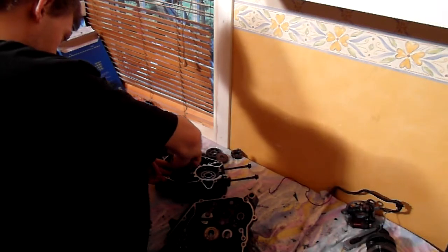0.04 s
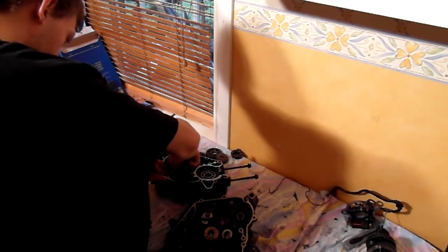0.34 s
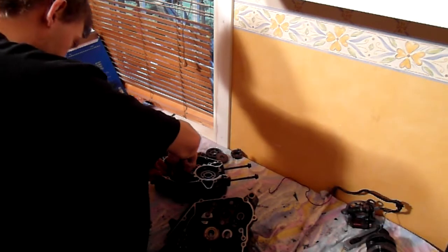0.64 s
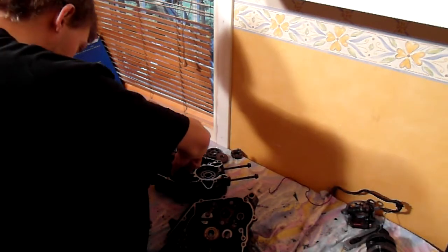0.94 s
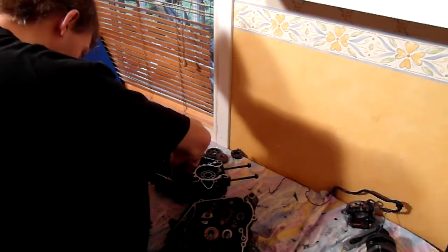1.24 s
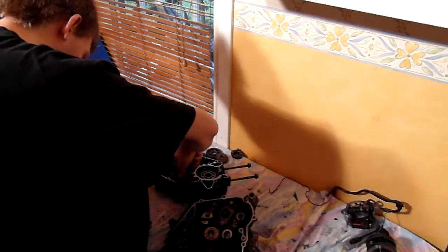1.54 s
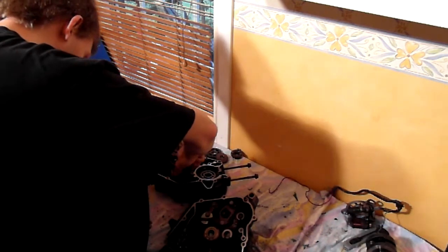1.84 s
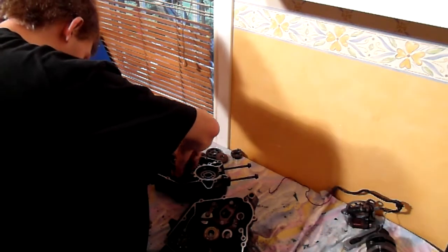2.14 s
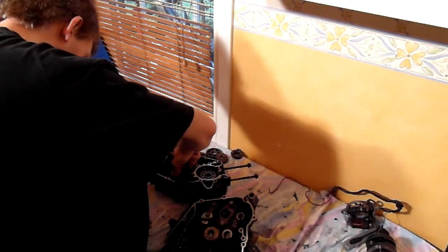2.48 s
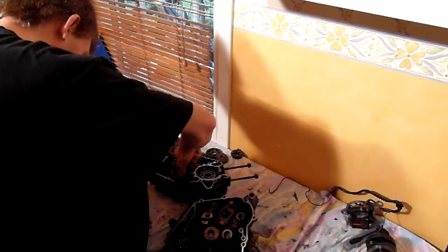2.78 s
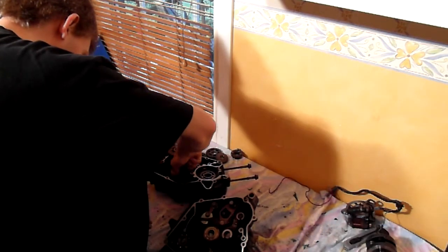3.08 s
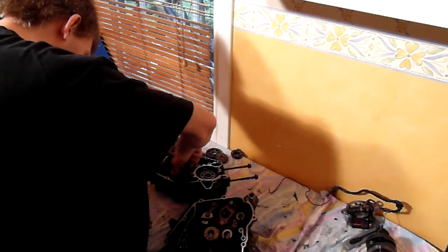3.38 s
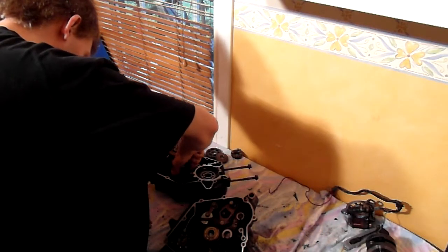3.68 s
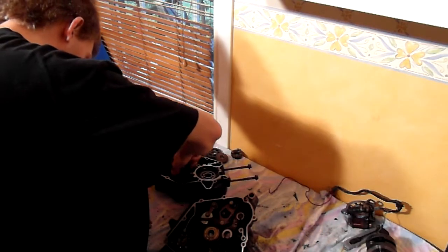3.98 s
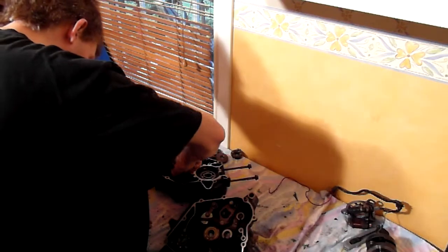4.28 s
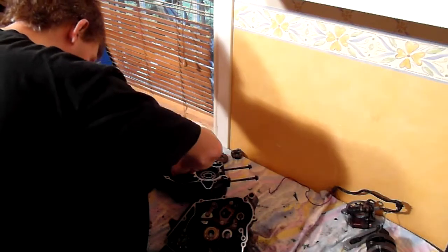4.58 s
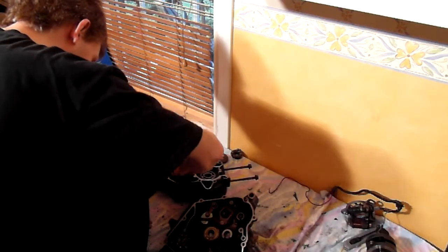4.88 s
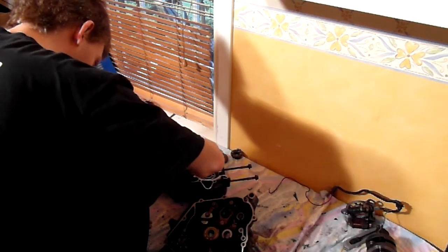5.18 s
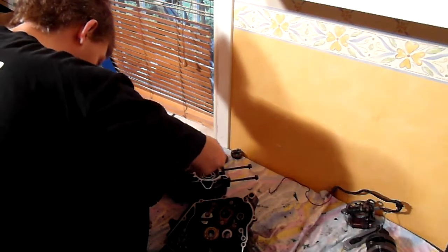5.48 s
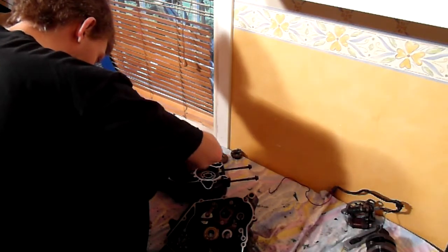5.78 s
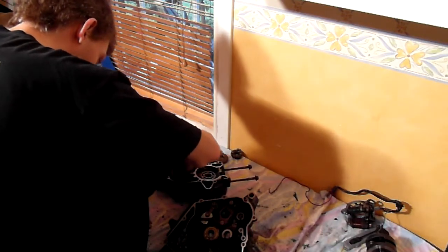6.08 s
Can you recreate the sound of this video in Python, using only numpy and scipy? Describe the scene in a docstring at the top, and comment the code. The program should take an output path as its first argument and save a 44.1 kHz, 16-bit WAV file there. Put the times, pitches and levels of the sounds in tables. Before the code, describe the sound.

A small gearbox being shifted by hand on a workshop table, ticking faintly at first, then snapping and clunking into gear.

```python
"""Light clicks and soft bumps, then louder clunks: a small gearbox in an open engine case is shifted
by hand on a table in a workshop corner. The shift pawl clicks and the detent snaps home. In each shift
the gear dogs butt, slide on and drop into their slots; in between, the shafts bump in their play.
Each impact excites the resonances of the steel parts or of the case, and the parts rebound.
Near walls reflect every blow at once; a faint hiss and hum lie underneath."""
import sys
import numpy as np
from scipy import signal
from scipy.fft import rfft, irfft
from scipy.io import wavfile

SR = 44100
rng = np.random.default_rng(int(sys.argv[2]) if len(sys.argv) > 2 else 0)


def dump(signal):
    """Clip the signal to [-1, 1] and save it as 16-bit WAV at the path in sys.argv[1]."""
    limited = np.clip(np.atleast_2d(signal).T, -1, 1)
    pcm = np.round(limited * 32767).astype(np.int16)
    wavfile.write(sys.argv[1], SR, pcm)


N = 270308
RING = np.arange(16384) / SR  # time axis of one blow, in seconds

# Normal modes of the case on its table. Each row: frequency in Hz, level in dB, 60 dB decay in seconds.
CASE_MODES = [(127.5, -22, 0.53), (160.7, -5.5, 0.2), (195, 2, 0.15), (258.2, -4, 0.21),
              (286.3, -10.5, 0.24), (339.2, 0.5, 0.15), (411.2, -13.5, 0.4), (455.1, -9, 0.24),
              (574, -14, 0.31), (552, -1, 0.051), (675, -33.5, 0.57), (719, -11.5, 0.24), (802, -2, 0.2),
              (919, -16, 0.079)]
# Spectra of overlapping modes in the case and in the gears, and a flat spectrum.
# Each row: frequency in Hz, relative spectral density in dB.
CASE_DENSE_MODES = [(30, -22), (62, -27), (110, 10.5), (170, -1), (280, 2.5), (420, 3.5), (640, -2.5),
                    (850, -0.5), (1000, -14.5), (1200, -24), (3000, -37.5)]
GEAR_DENSE_MODES = [(300, -3), (900, 6.5), (1250, -1.5), (1700, 4.5), (3900, 2.5), (6000, 0.5),
                    (9000, -3.5), (11500, -7)]
WHITE = [(20, 0), (20000, 0)]


def from_db(db):
    """Amplitude ratio of a level in decibels."""
    return 10 ** (np.asarray(db) / 20)


def at_hz(points, hz):
    """Interpolation of a table on a logarithmic frequency axis."""
    known_hz, values = np.transpose(points)
    return np.interp(np.log(hz + 1), np.log(known_hz), values)


def butter(x, hz, kind, order=2):
    """Causal low- or high-pass with a maximally flat passband."""
    return signal.sosfilt(signal.butter(order, np.clip(hz, 15, .45 * SR), kind, fs=SR, output="sos"), x)


def unit_attack(x):
    """Normalisation of a blow to rms 1 over its first 20 ms."""
    return x / np.sqrt(np.mean(x[..., :SR // 50] ** 2) + 1e-20)


def decay(t60):
    """Exponential damping: the envelope falls 60 dB in t60 seconds."""
    return np.exp(-np.log(1000) * RING / max(t60, 1e-3))


def resonate(x, hz, width_hz):
    """Two-pole resonance with unit gain at its peak."""
    r = np.exp(-np.pi * width_hz / SR)
    feedback = [1, -2 * r * np.cos(2 * np.pi * hz / SR), r * r]
    return signal.lfilter(np.array([1, 0, -1]) * (1 - r * r) / 2, feedback, x)


def through_peaks(x, peaks):
    """Forced vibration of a steel part: parallel resonances of alternating sign."""
    return unit_attack(sum((-1) ** k * from_db(db) * resonate(x, hz, width_hz)
                           for k, (hz, width_hz, db) in enumerate(peaks)))


def struck(modes, spread_db):
    """Free vibration: a sum of damped modes, each with a random sign and strength."""
    ring = 0
    for hz, db, t60 in modes:
        amplitude = rng.choice([-1, 1]) * from_db(db + spread_db * rng.standard_normal())
        ring += amplitude * np.sin(2 * np.pi * hz * RING) * decay(t60)
    return unit_attack(ring)


def diffuse_noise(spectrum, correlation, size):
    """Diffuse field: noise from all sides is partly correlated at two close microphones; rms 1."""
    hz = np.fft.rfftfreq(size, 1 / SR)
    mid, side = rfft(rng.standard_normal((2, size)))
    alike = np.clip(at_hz(correlation, hz), -.99, .995)
    pair = np.sqrt(1 + alike) * mid + np.sqrt(1 - alike) * side * [[1], [-1]]
    noise = irfft(pair * from_db(at_hz(spectrum, hz)), size)
    return noise / noise.std()


def still_room(hiss_db=-64, hum_db=-79, hum_hz=99):
    """Noise floor: stationary hiss with a trace of mains hum."""
    # The hiss. Each row: frequency in Hz, relative spectral density in dB.
    spectrum = [(15, -64), (25, -13), (70, -16), (90, -6.5), (126, -9), (184, -8.5), (204, -4.5), (257, -6),
                (398, -2.5), (476, -7.5), (514, -4), (615, -7), (815, -8.5), (1200, -11.5), (11400, -18.5),
                (14800, -111), (22000, -120)]
    # Its likeness at the microphones. Each row: frequency in Hz, correlation coefficient.
    correlation = [(100, 0.7), (300, 0.82), (600, 0.64), (1200, 0.56), (2600, 0.32), (5600, 0.033),
                   (11000, 0.014)]
    hum = from_db(hum_db) * np.sqrt(2) * np.sin(2 * np.pi * hum_hz * np.arange(N) / SR)
    return from_db(hiss_db) * diffuse_noise(spectrum, correlation, size=N) + hum


def wash(spectrum, t60, contact_s=.002, early_s=0.056, early_db=16, grain_db=2.5):
    """Reverberation of a blow: early reflections, then a tail, grainy from chatter and single echoes."""
    # Likeness of a blow at the microphones. Each row: frequency in Hz, correlation coefficient.
    correlation = [(100, .99), (300, .993), (700, .985), (1200, .96), (2600, .9), (5500, .72), (11000, .45)]
    early = 1 + from_db(early_db) / (1 + (RING / early_s) ** 4)
    steps = RING[::64]
    grain = from_db(grain_db * np.interp(RING, steps, rng.standard_normal(len(steps))))
    contact = np.minimum(RING / contact_s, 1)
    noise = diffuse_noise(spectrum, correlation, size=len(RING))
    return unit_attack(noise * contact * early * grain * decay(t60))


def bump(hz, swell_s=0.001):
    """Band-limited excitation: a soft push shakes the case only around one pitch."""
    push = wash(CASE_DENSE_MODES, t60=0.3) + from_db(0.5) * struck(CASE_MODES, spread_db=0.3)
    swell = np.minimum(RING / swell_s, 1)
    band = resonate(push * swell, hz, width_hz=0.44 * hz)
    return unit_attack(butter(band, 1.67 * hz, "low", order=4))


def shafts(touch_db=-6.5, settle_s=0.033, settle_db=-15.5):
    """Backlash: a shaft touches with a tick, crosses its play, pushes on the case and settles."""
    # Shaft bumps. Each row: start in seconds, level in dB, pitch in Hz, crossing in seconds, tick in dB.
    bumps = [(0.384, -57.5, 370, .039, -66), (0.71, -66.5, 410, 0.011, -75),
             (1.031, -42.5, 382, 0.0084, -61), (1.092, -50.5, 410, .022, -70),
             (1.283, -48.5, 395, 0.029, -70), (1.618, -53.5, 327, .012, -67),
             (2.168, -61.5, 390, .012, -69.5), (2.674, -50, 352, .022, -58), (4.758, -53.5, 260, .012, -72),
             (5.188, -58, 260, 0.017, -67), (5.223, -46.5, 387, 0.0082, -62),
             (5.449, -44.5, 347, 0.0062, -58.5), (5.778, -46.5, 185, 0.013, -72),
             (5.955, -43, 238, 0.0087, -73)]
    # The tick of the teeth. Each row: frequency in Hz, relative spectral density in dB.
    tick = [(300, 2), (900, 0), (2000, -2.5), (5500, -10), (7000, -16), (11500, -18.5)]
    for s, db, hz, cross_s, tick_db in bumps:
        yield s, from_db(db + touch_db) * bump(hz) + from_db(tick_db) * wash(tick, t60=0.31)
        yield s + cross_s, from_db(db) * bump(hz) + from_db(tick_db - 0.5) * wash(tick, t60=0.18)
        yield s + cross_s + settle_s, from_db(db + settle_db) * bump(hz)


def pawl(hardness_hz):
    """Impact on a thin steel plate: the shorter the contact, the brighter the click."""
    # Resonances of the pawl. Each row: frequency in Hz, bandwidth in Hz, level in dB.
    peaks = [(1520, 167, 4.5), (1920, 400, -2.5), (2774, 77, 7), (3350, 260, -7), (4820, 157, 0.5),
             (5150, 290, 1), (7330, 460, -6.5), (10970, 370, -1)]
    click = through_peaks(wash(WHITE, t60=0.14), peaks) + from_db(-13) * wash(GEAR_DENSE_MODES, t60=0.22)
    return unit_attack(butter(click, hardness_hz, "low", order=3) + 0.098 * click)


def detent(ring_db=-6.5):
    """Forced and free vibration: the sprung lever chatters into its notch and its modes ring cleanly."""
    # Resonances of the lever and its spring. Each row: frequency in Hz, bandwidth in Hz, level in dB.
    peaks = [(1700, 54, -8.5), (2690, 103, 6), (2830, 31, -1), (2967, 30, -4), (3224, 38, -7),
             (3400, 20, -8), (3590, 29, -2.5), (4340, 47, -9), (5027, 74, 1), (5290, 160, 2), (5401, 83, 4),
             (5460, 60, 2), (6080, 50, -3), (6273, 54, -3), (6660, 62, -6), (9330, 300, -10),
             (10300, 450, -11)]
    chatter = through_peaks(wash(WHITE, t60=0.12), peaks)
    ring = struck([(hz, db, .13) for hz, _, db in peaks], spread_db=1.2)
    return unit_attack(chatter + from_db(ring_db) * ring)


def case(lowest_hz):
    """Modal response of casting and table: a brief, light blow hardly moves the lowest modes."""
    boom = butter(struck(CASE_MODES, spread_db=1.35), 2000, "low")
    dense = from_db(-3) * wash(CASE_DENSE_MODES, t60=0.27)
    return unit_attack(butter(boom + dense, lowest_hz, "high", order=4))


def gears(hardness_hz):
    """Contact time limits bandwidth: steel dogs clash, with less treble when oil cushions them."""
    # Resonances of the gear cluster. Each row: frequency in Hz, bandwidth in Hz, level in dB.
    peaks = [(1610, 170, 5.5), (2030, 170, 5.5), (2370, 110, -5), (2910, 230, 7), (3830, 450, 6),
             (4560, 150, 6.5), (5400, 160, 4.5), (7850, 590, 0.5), (10870, 1040, 5)]
    clash = through_peaks(wash(WHITE, t60=0.18), peaks) + from_db(-2) * wash(GEAR_DENSE_MODES, t60=0.23)
    return unit_attack(butter(clash, hardness_hz, "low", order=6) + from_db(-22.5) * clash)


def clunk(case_db, lowest_hz, steel_db, hardness_hz):
    """Structure-borne sound: steel meets steel and shakes the case."""
    return from_db(case_db) * case(lowest_hz) + from_db(steel_db) * gears(hardness_hz)


def selector(push_db=-2.5):
    """Impact and rebound in the shift mechanism: pawl, detent, spring and stop."""
    # The pawl drops over a pin and pushes on the case.
    # Each row: start in seconds, level in dB, contact cutoff in Hz, pitch of the push in Hz.
    pawl_drops = [(0.0, -45, 7900, 516), (0.622, -44.5, 9600, 390), (1.722, -48.5, 3470, 347),
                  (5.262, -39, 19000, 410)]
    # The detent snaps home; a small spring zings. Each row: start in seconds, level in dB.
    detent_snaps = [(2.9, -29)]
    zings = [(3.201, -50)]
    # The pawl bounces twice; the detent's roller bottoms out, then hops once.
    # Each row: delay in seconds, relative level in dB.
    pawl_bounces = [(.011, -4), (.035, -11)]
    detent_bounces = [(.005, 2), (.066, -16.5)]
    # Resonances of the small spring. Each row: frequency in Hz, bandwidth in Hz, level in dB.
    spring_peaks = [(5200, 210, 0), (10770, 220, 0)]
    # The selector hits its stop. Each row: start in seconds, case level in dB, its low cutoff in Hz,
    # steel level in dB, contact cutoff in Hz.
    stops = [(1.094, -56.5, 650, -65.5, 2500), (1.729, -41.5, 84.5, -47, 3000),
             (2.901, -34.5, 62, -28.5, 11100)]
    for s, db, hardness_hz, push_hz in pawl_drops:
        yield s, from_db(db + push_db) * bump(push_hz)
        for delay, bounce_db in [(0, 0.0038)] + pawl_bounces:
            yield s + delay, from_db(db + bounce_db) * pawl(hardness_hz)
    for s, db in detent_snaps:
        for delay, bounce_db in [(0, 0)] + detent_bounces:
            yield s + delay, from_db(db + bounce_db) * detent()
    for s, db in zings:
        yield s, from_db(db) * through_peaks(wash(WHITE, t60=0.28), spring_peaks)
    for s, *blow in stops:
        yield s, clunk(*blow)


def gear_changes(rattles=3, gap_s=.02, first_db=-10.5, loss_db=7):
    """Inelastic collisions: the dogs butt twice, slide on, seat and rattle ever more weakly."""
    # Shifts. Each row: start in seconds; the butt's case level in dB, low cutoff in Hz and steel level
    # in dB; slide in seconds; the same three for the seating, and its contact cutoff in Hz.
    shifts = [(3.164, -32, 129, -54.5, 0.042, -34.5, 167, -34.5, 4100),
              (3.347, -42, 290, -51.5, .045, -28, 115, -28.5, 10900),
              (4.597, -28, 129, -43, 0.042, -40, 201, -41.5, 3680),
              (5.506, -42, 180, -57.5, 0.049, -37.5, 170, -50, 1780)]
    oil_cutoff_hz, rebutt_s = 2920, .016  # the dog faces meet through a film of oil
    for s, butt_db, butt_hz, butt_steel_db, slide_s, seat_db, seat_hz, seat_steel_db, hard_hz in shifts:
        yield s, clunk(butt_db, butt_hz, butt_steel_db, oil_cutoff_hz)
        # With the oil squeezed out: less boom, more steel.
        yield s + rebutt_s, clunk(butt_db - 4, butt_hz, butt_steel_db + 2.5, oil_cutoff_hz)
        yield s + slide_s, clunk(seat_db, seat_hz, seat_steel_db, hard_hz)
        for k in range(rattles):
            rattle = clunk(seat_db - 3, seat_hz, seat_steel_db, hard_hz)  # light: shakes the case less
            yield s + slide_s + (k + 1) * gap_s, from_db(first_db - k * loss_db) * rattle


def microphones(x, right_lead_samples=1.5):
    """Time and level cues: sound reaches the right microphone sooner; the housing tilts the balance."""
    # Stereo balance. Each row: frequency in Hz, left minus right level in dB.
    balance = [(60, 0), (200, 1.7), (630, 2), (2000, .5), (6600, -1), (11500, -3.5)]
    hz = np.fft.rfftfreq(2 * N, 1 / SR)
    sides = np.array([[.5], [-.5]])
    delay = np.exp(-2j * np.pi * hz * right_lead_samples / SR * sides)
    tilt = from_db(at_hz(balance, hz) * sides)
    return irfft(rfft(x, 2 * N) * delay * tilt)[:, :N]


def scene():
    """Superposition: every contact, given as (start in seconds, sound), adds to the quiet room."""
    contacts = np.zeros((2, N))
    for s, sound in (*selector(), *gear_changes(), *shafts()):
        start = round(s * SR)
        contacts[:, start:start + len(RING)] += sound[..., :N - start]
    return microphones(contacts) + still_room()


def record(dry):
    """Band limiting: an elliptic low-pass cuts steeply above 11.6 kHz."""
    return signal.sosfilt(signal.ellip(12, .1, 80, 11600, fs=SR, output="sos"), dry)


dry = scene()
out = record(dry)
dump(out)
```